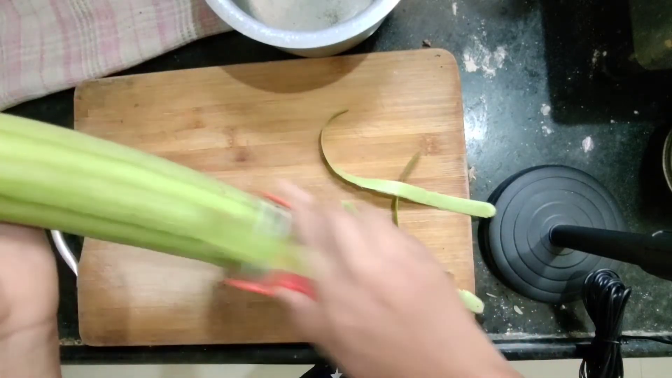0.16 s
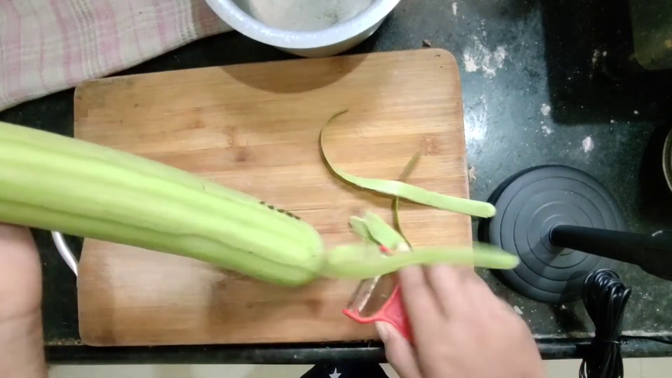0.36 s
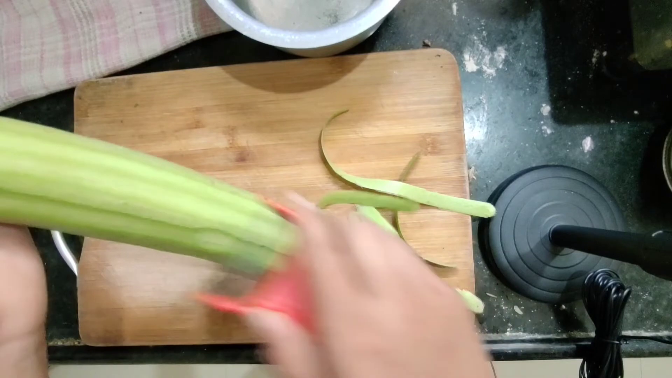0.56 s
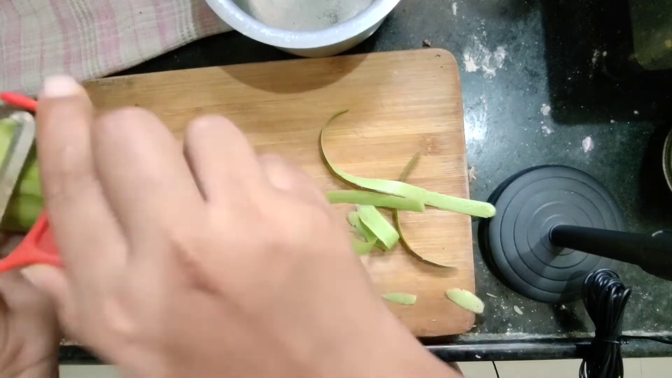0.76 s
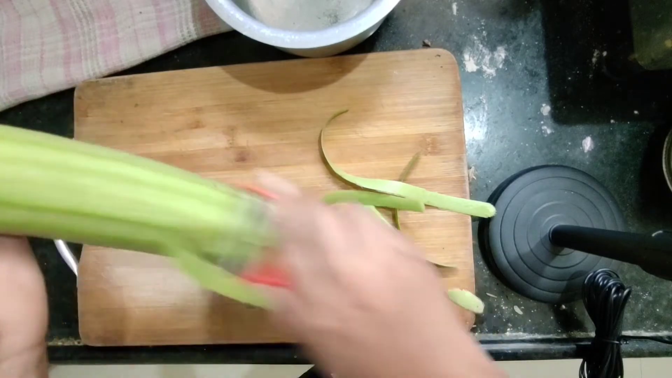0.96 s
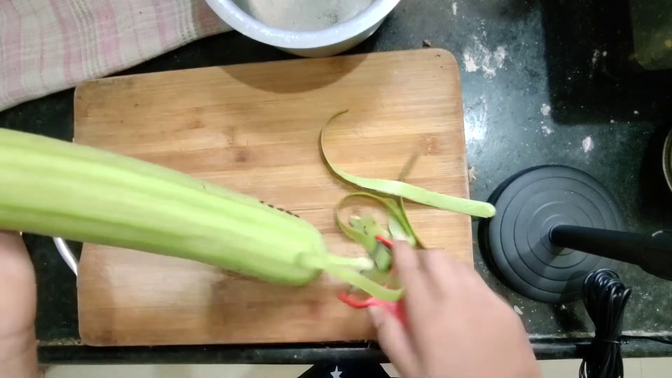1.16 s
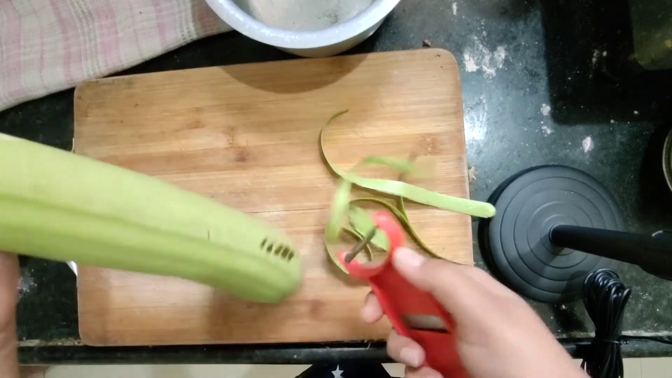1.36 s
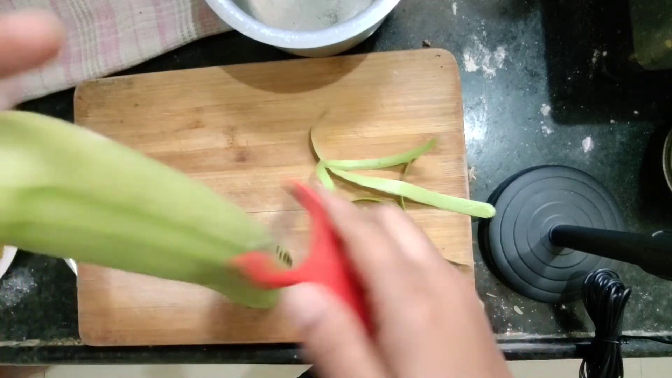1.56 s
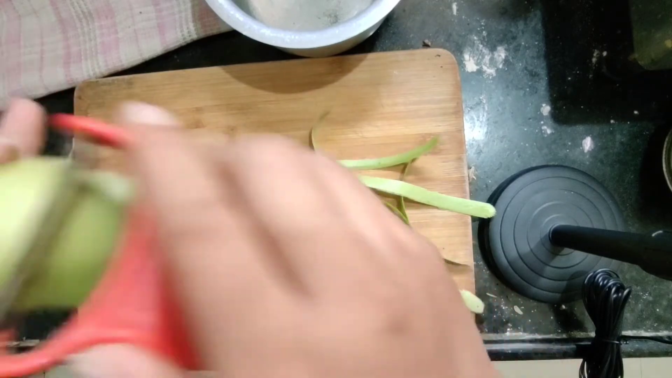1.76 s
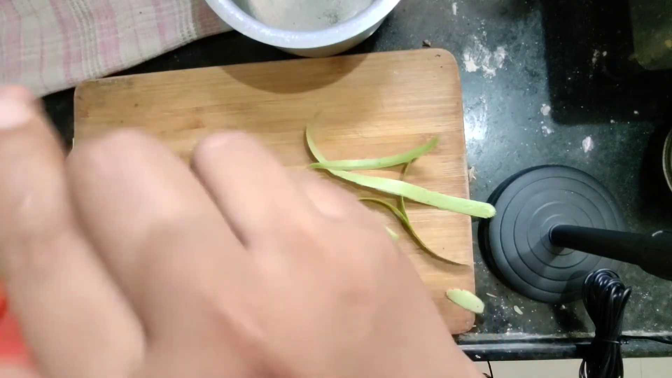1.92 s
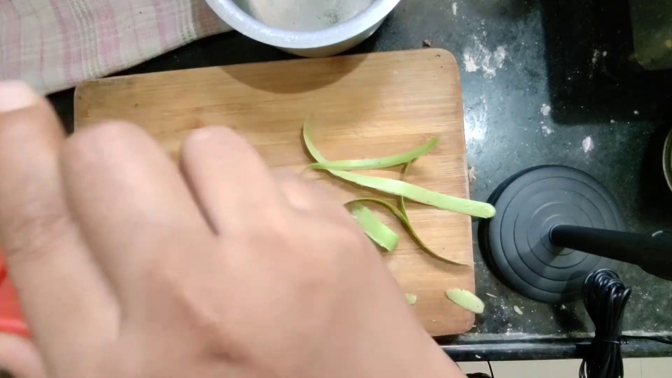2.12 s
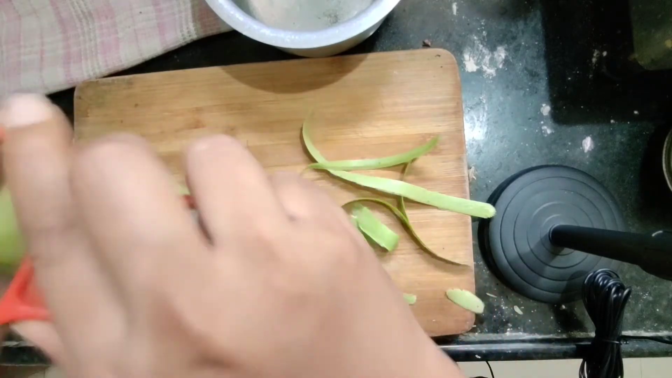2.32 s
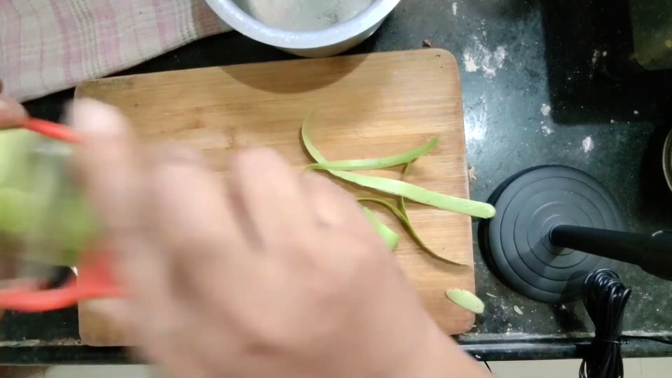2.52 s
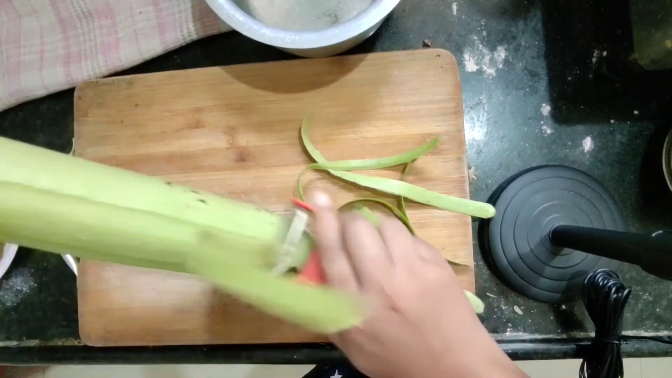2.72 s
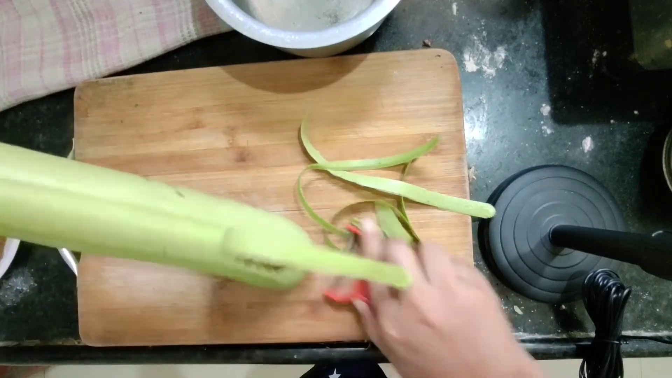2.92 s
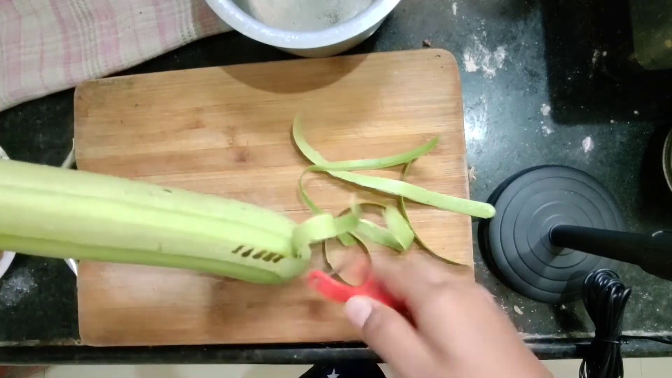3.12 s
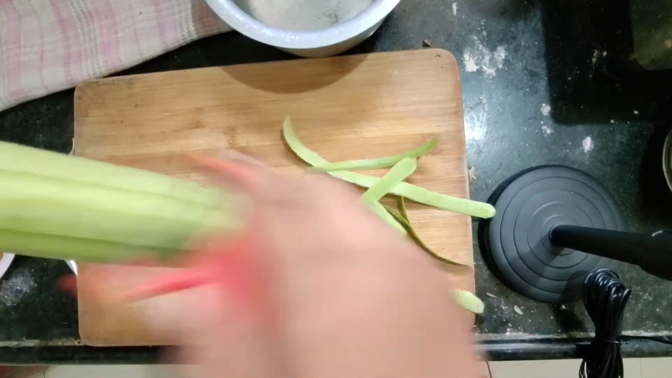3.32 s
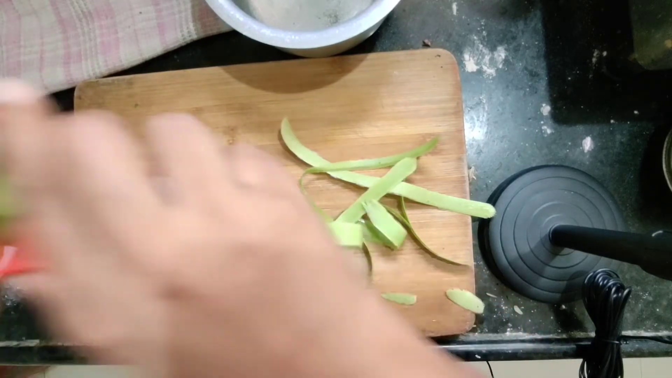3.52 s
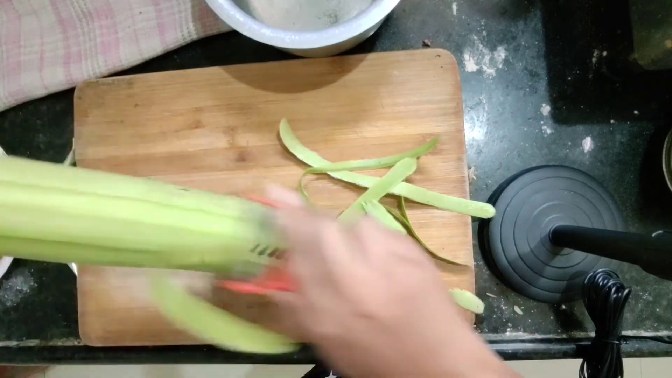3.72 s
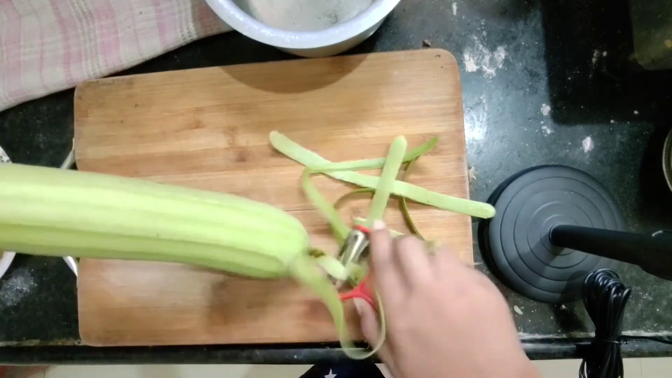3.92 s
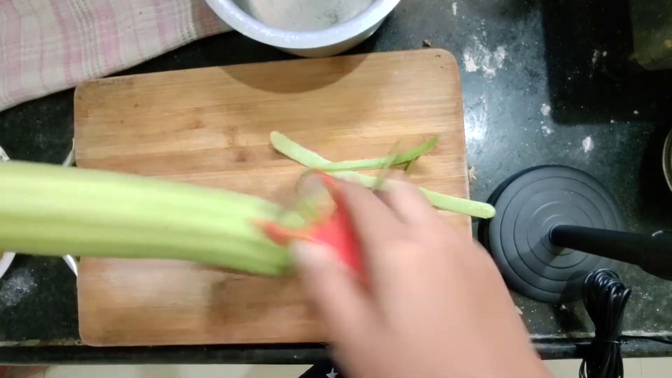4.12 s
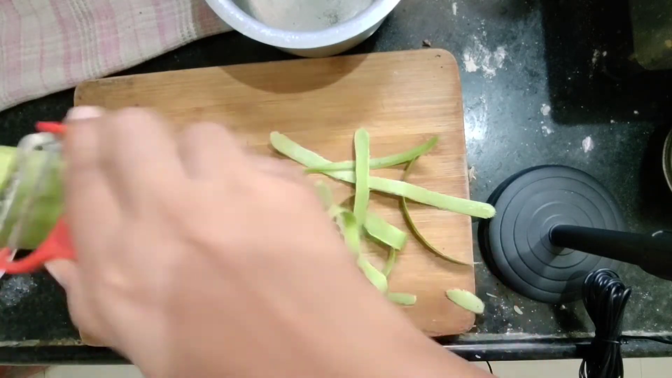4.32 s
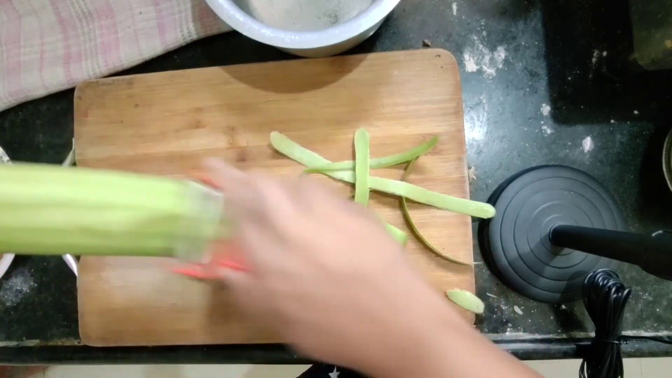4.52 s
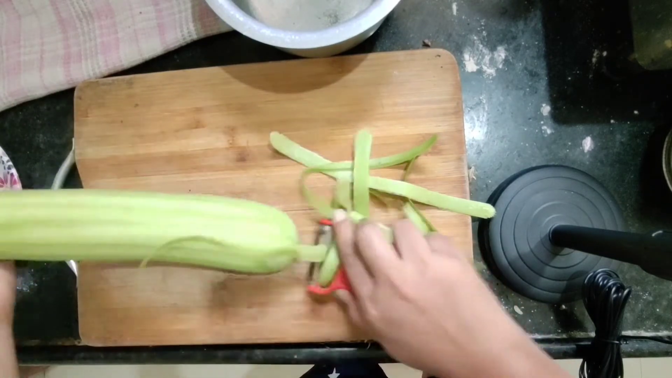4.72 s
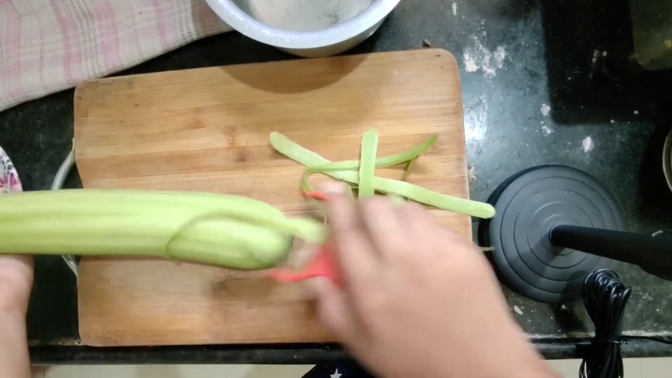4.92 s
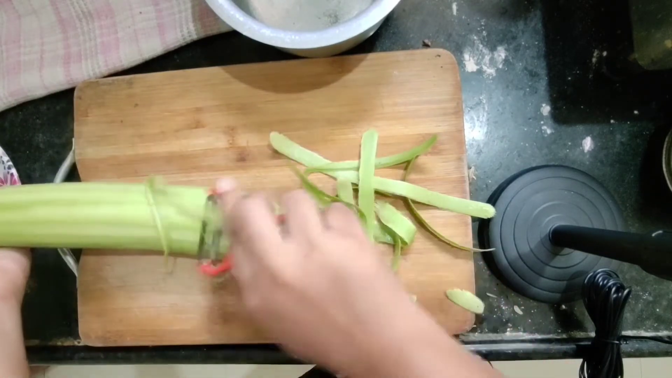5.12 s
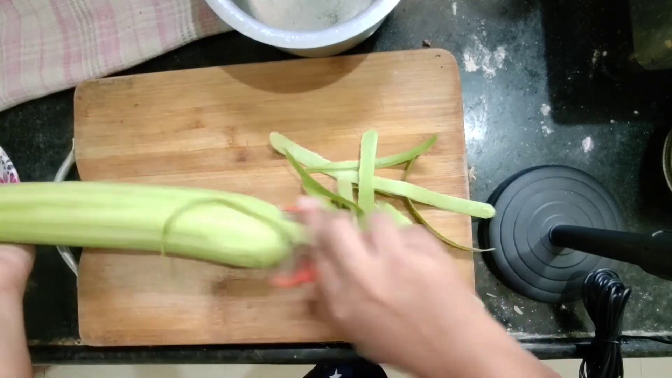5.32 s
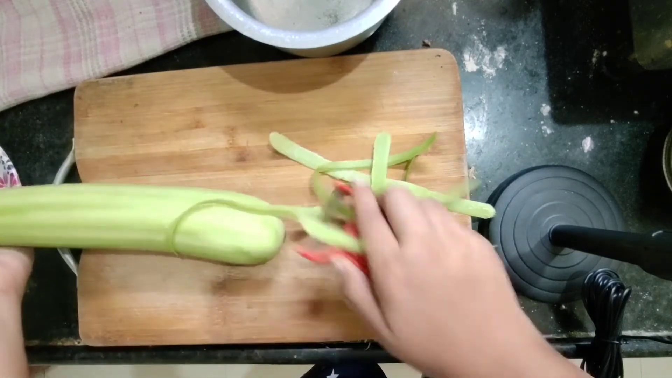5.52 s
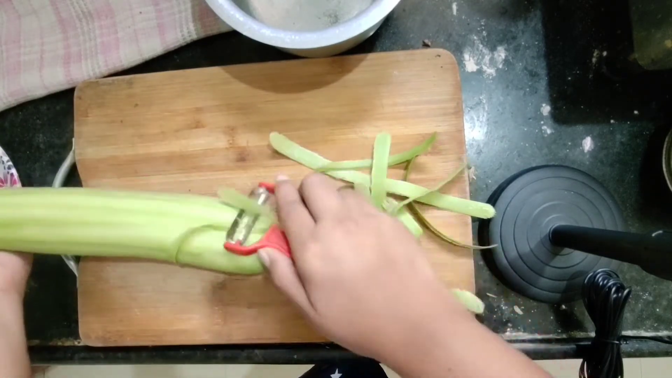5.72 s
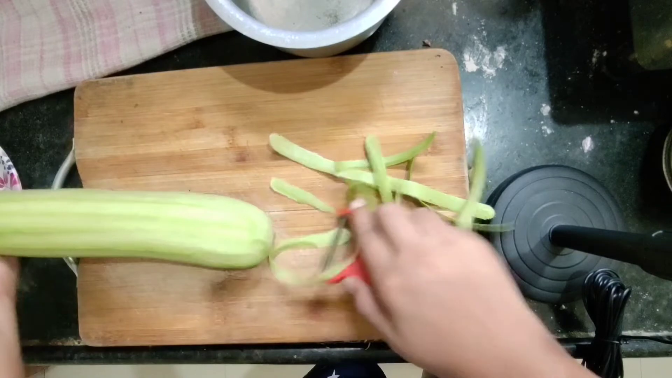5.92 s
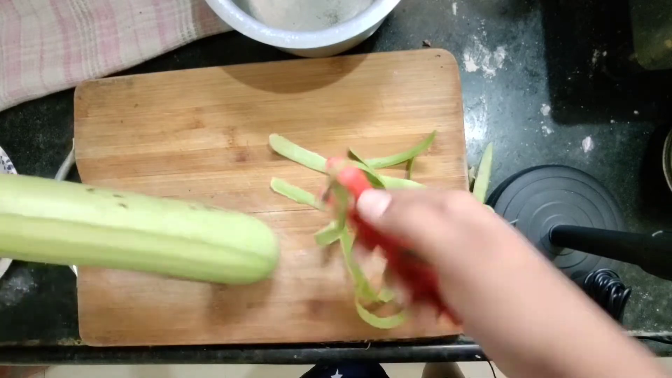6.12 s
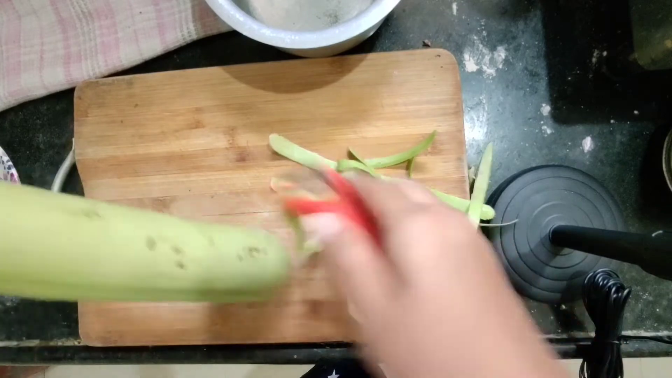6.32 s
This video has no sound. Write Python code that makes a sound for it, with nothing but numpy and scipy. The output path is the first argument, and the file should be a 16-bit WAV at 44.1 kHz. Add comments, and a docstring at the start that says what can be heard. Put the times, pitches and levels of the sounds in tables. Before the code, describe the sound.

Close up in a hard, lively kitchen, a loose-bladed peeler works along a raw gourd. A clack opens, then a crisp, wet, crunchy rasp runs to 0.4 s, ending in a rapid cluster of sharp snaps and a soft flop of peel near 0.5. A second stroke at 0.9-1.2 s ends with a snap. Light knocks and rubbing follow; around 2.0-2.1 the blade rattles repeatedly. A faint short scrape comes at 2.4 with dull bumps, then a longer, strong rasp from 2.6 to 3.1, snap and wet flops. More knocks lead to brisk strokes at 3.65-3.95, 4.5-4.8 and a slightly quieter one at 5.3-5.5, each preceded by clacks and finished by a bright snap and a flop. A last double snap clicks at 6.0. The short room ring fades into faint rumbling house noise, wavering low hum and light hiss.

```python
"""Peeling a gourd in a kitchen

A swivel peeler takes seven quick strips off a raw gourd above a wooden board in a hard-walled kitchen.
The rasp is made of tiny random bursts sent through filters and resonances; the blade snaps against its stop
as short noise buzzes; knocks, wet flops, dull bumps and rubbing fill the gaps.
Shaped random reflections make the room ring, over faint house noise, a hum and hiss."""
import sys
import numpy as np
from scipy import signal
from scipy.io import wavfile
from scipy.ndimage import uniform_filter1d, map_coordinates

SR = 44100
rng = np.random.default_rng(int(sys.argv[2]) if len(sys.argv) > 2 else 0)


def materialize(psi):
    """Save the field psi as 16-bit PCM at rate SR to the path in sys.argv[1].

    A 1-D psi becomes a single channel; in a 2-D psi each row is a channel.
    """
    bounded = np.clip(np.atleast_2d(psi).T, -1, 1)
    quanta = np.round(bounded * 32767).astype(np.int16)
    wavfile.write(sys.argv[1], SR, quanta)


N = 280598

# cells of the skin bursting against the steel: (frequency [Hz], relative level [dB per Hz])
TEAR_SPECTRUM = [(700, -43), (1550, -13.5), (2100, -14.5), (3450, -6.5), (3900, -0.5), (4450, -12.5),
                 (5750, -1.5), (6650, -2), (7200, -11), (8950, -4), (9900, -12), (12200, -11),
                 (14100, -18.5), (14800, -18)]
# resonances of the loose blade: (frequency [Hz], width [Hz], relative level [dB])
LOOSE_MODES = [(3244, 290, 4), (3472, 256, 2.5), (3930, 96, -6.5)]
# the crack of the stop, summed over all directions, as the room receives it; it also colours the peel
# and the rustle: (frequency [Hz], relative level [dB per Hz])
SPREAD_SPECTRUM = [(200, -41.5), (750, -15), (1350, -11.5), (1950, -7), (2450, -4.5), (2830, 5), (3150, 0),
                   (3400, 1.5), (3900, -4), (5600, 1.5), (7300, -1), (10000, -7), (13500, -15),
                   (15000, -16)]


def rasp():
    """Cells burst under the edge; the blade sticks and slips, and the flesh resounds."""
    # typically the blade lands, bites, eases and leaves; the bite may be set before the landing and the
    # easing after the leaving; a negative easing or catch reverses the change of level:
    # (lands [s], bites [s], has eased [s], leaves [s], landing time [s], tearing [dB], chatter [dB],
    # crunch [dB], easing drop [dB], catch rise [dB], brightness [dB per octave])
    strokes = [(.05, 0.167, .4, 0.42, 0.0032, -34, -32, -46.5, 6, -1, 0.5),
               (0.899, 0.97, 1.24, 1.222, .02, -36.5, -33.5, -48, 5.5, -2.5, -1),
               (2.355, 2.365, 2.43, 2.48, .006, -62, -47.5, -70, 6, -0.5, -4.5),
               (2.591, 2.68, 2.934, 3.103, 0.1, -33, -33, -46, 14.5, 8, 0),
               (3.646, 3.678, 3.95, 3.943, 0.018, -34.5, -32.5, -46, -2, 7, -0.6),
               (4.525, 4.555, 4.775, 4.832, .025, -36.5, -34.5, -47.5, 5.5, 7, 2),
               (5.272, 5.265, 5.44, 5.484, 0.0021, -42, -38.5, -52, 3, 10, -1.5)]
    # how each sound answers a stroke: (lag behind the bite [s], drop while skimming [dB],
    # turning point [share of the pull], drop before it [dB], drop after it [dB] (negative: louder),
    # share of the easing [ratio])
    answers = ((0.04, 4.5, .5, 3, 0.5, 1.0), (0.04, 7, 0.07, -1.3, 8, 0.88), (0.07, 16.5, 0.46, 2.5, -4.5, 0.7))
    # how much of the catch goes into each: (tearing [ratio], chatter [ratio], crunch [ratio])
    catch_shares = (1, 1.3, .25)
    # how much the uneven skin shakes each: (tearing [dB], chatter [dB], crunch [dB])
    uneven_levels = (0.67, 1.6, 0.4)
    # the blade held in the flesh, before the sag: (frequency [Hz], width [Hz], relative level [dB])
    held_modes = [(2861, 200, 0), (3154, 146, 4.5)]
    # the body of the gourd under the blade: (frequency [Hz], relative level [dB per Hz])
    flesh_spectrum = [(250, -31), (520, -21), (720, -2), (950, 1.5), (1200, -2), (1550, -16.5),
                      (2200, -34.5)]
    # the growing strip loads the blade and lowers its pitch: (share of the stroke [ratio], pitch factor [ratio])
    sag_curve = [(0, 1.06), (.55, 0.98), (1, .95)]
    catch_power = 0.87  # the catch builds as this power of time
    out = np.zeros(N)
    for (start, bite, eased, end, landing, tear_db, chatter_db, crunch_db,
         ease_db, catch_db, tilt_db) in strokes:
        t = np.arange(start, end, 1 / SR)
        along = np.linspace(0, 1, len(t))
        past_easing = np.clip((t - eased) / max(end - eased, 1e-3), 0, 1)
        catch = catch_db * past_easing ** catch_power

        gains = []
        levels = (tear_db, chatter_db, crunch_db)
        for db, answer, share, uneven_db in zip(levels, answers, catch_shares, uneven_levels):
            press_db = pressure(t, bite, eased, ease_db, *answer)
            gains.append(amp(db + press_db + share * catch + uneven_db * wobble(t)))
        tear, chatter, crunch = gains

        cells = grains(len(t), per_s=5500, spread_db=2.5)
        slips = grains(len(t), per_s=600, spread_db=-0.5)
        skin = off_board(colour(cells + 0.21 * slips, TEAR_SPECTRUM, tilt_db), along)

        sag = np.interp(along, *np.transpose(sag_curve)) * (1 + 0.028 * wobble(t))
        push = slips + 0.89 * cells
        blade = np.zeros(len(t))
        for k, (hz, width, db) in enumerate(held_modes):
            tone = resonate(resonate(push, hz * sag, width), hz * sag, 3 * width)
            blade += (-1) ** k * amp(db) * tone
        flesh = evened(colour(cells, flesh_spectrum))

        fade = np.clip(np.minimum((t - start) / landing, (end - t) / 0.0034), 0, 1)
        add(out, start, fade * (tear * skin + chatter * evened(blade) + crunch * flesh))
    return out


def pressure(t, bite, eased, ease_db, lag, skim_db, turn, early_db, late_db, share):
    """Level in dB over a stroke: low while skimming, up at the bite, then a curved rise or fall to the end."""
    bite_s = 0.0062  # how quickly the edge sinks in
    pull = np.clip((t - bite) / (eased - bite), 0, 1)
    turn = np.clip(turn, .05, .95)
    skimming = .5 - .5 * np.tanh((t - bite - lag) / (2 * bite_s))
    before = np.maximum(1 - pull / turn, 0)
    after = np.maximum((pull - turn) / (1 - turn), 0)
    return -skim_db * skimming - early_db * before ** 2 - (late_db + share * ease_db) * after ** 2


def off_board(x, along, far_s=.00078, near_s=.00052, shake_s=.000015):
    """The board's reflection arrives ever sooner as the unsteady blade comes down: a rising comb."""
    board_echo = .33  # strength of the reflection beside the direct sound
    steady_s = far_s + (near_s - far_s) * along
    delay = (steady_s + shake_s * wobble(np.arange(len(x)) / SR)) * SR  # in samples
    return evened(x + board_echo * map_coordinates(x, [np.arange(len(x)) - delay], order=3))


def snaps():
    """The freed blade buzzes against its stop for a few milliseconds: returns direct sound and room feed."""
    # the blade slips off the end and hits its stop:
    # (time [s], level [dB], ring [Hz], relative ring level [dB], brightness [dB per octave], room level [dB])
    stop_hits = [(0.4173, -11, 2880, -11, 0.5, -3), (0.4322, -8.5, 8330, -4, -0.5, -7),
                 (0.4535, -18, 5630, 0.5, -2, -10), (1.2312, -12.5, 3020, -14.5, -4.5, -5),
                 (3.0551, -8, 3235, -14, 2, -6), (3.974, -8.5, 3140, -4.5, 2.5, -2.5),
                 (4.8424, -9.5, 2870, -5.5, -1, -3), (5.4934, -9, 3240, -17, -3.5, -4.5),
                 (5.9869, -8, 7930, 0.5, -0.5, -7), (6.0073, -12, 2870, -2.5, -2.5, -1)]
    # the crack of the stop: (frequency [Hz], relative level [dB per Hz])
    crack_spectrum = [(150, -47), (450, -32.5), (800, -13.5), (1400, -19.5), (2350, -16), (2850, 9.5),
                      (3300, -0.5), (3700, 2.5), (4700, -7), (5800, 3.5), (7500, 1.5), (9700, -6.5),
                      (12000, -5.5), (15000, -19.5)]
    direct, spread, t = np.zeros(N), np.zeros(N), np.arange(4096) / SR
    for s, db, ring_hz, ring_db, tilt_db, room_db in stop_hits:
        onset = 1 - np.exp(-t / 0.0011)
        decay = np.exp(-(t / 0.0037) ** 4) + 0.21 * np.exp(-t / 0.013)
        buzz = rng.standard_normal(len(t)) * decay * onset
        tone = blow(ring(buzz, [(ring_hz, 300, 0)]))
        crack = blow(colour(buzz, crack_spectrum, tilt_db))
        add(direct, s, amp(db) * blow(crack + amp(ring_db) * tone))

        click = 1. * (t == 0)
        room_crack = blow(colour(click, SPREAD_SPECTRUM, 0.49 * tilt_db))
        add(spread, s, amp(db + room_db) * blow(room_crack + 0.32 * amp(ring_db) * tone))
    return direct, spread


def clacks():
    """A knock with grit just before and after rings the loose blade: returns main ring and high modes."""
    # the loose blade knocks in its frame: (time [s], level [dB], relative level of the high modes [dB])
    knocks = [(0.019, -28, 0.5), (0.039, -14, -1.5), (0.8853, -22.5, -3), (1.3222, -29, -2),
              (1.4226, -28.5, -19.5), (1.641, -41, -27), (1.98, -26.5, -15.5), (1.988, -29, -15),
              (2.0198, -23.5, -4), (2.0426, -24.5, -14), (2.0942, -28, -13), (2.1142, -23.5, -7.5),
              (2.376, -45.5, -2.5), (3.1642, -26.5, -1), (3.2925, -31, -6.5), (3.347, -25.5, -17.5),
              (3.5954, -41.5, -10), (3.6254, -29, -2), (3.6392, -23.5, -18), (3.6601, -28, -4.5),
              (4.4762, -44, -21), (4.503, -21, -6.5), (4.509, -15.5, -6), (5.2595, -19, -1),
              (5.827, -37, -31), (5.839, -38.5, -12), (5.855, -40, -11), (6.315, -45.5, -25)]
    # high modes, before their shaping below: (frequency [Hz], width [Hz], relative level [dB])
    high_modes = [(5750, 450, 7), (6825, 940, 0), (8090, 700, 5), (12000, 1200, -18.5)]
    # shaping of the two rings: (frequency [Hz], gain [dB])
    low_shape = [(400, -14.0), (1300, 4), (2000, -4), (2700, 1.5), (4000, 3), (6000, -12.0), (12000, -27.0)]
    high_shape = [(1000, -7.0), (5000, -3.0), (9000, -3.5), (10500, -5.0), (15000, 0.0)]
    main, bright, t = np.zeros(N), np.zeros(N), np.arange(-512, 2048) / SR
    for s, db, high_db in knocks:
        grazing = 0.072 * np.exp(-abs(t) / .0018)  # against the frame, before the knock
        settling = 0.078 * np.exp(-abs(t) / 0.0051)
        grit = np.where(t < 0, grazing, settling)
        knock = (t == 0) + grit * rng.standard_normal(len(t))
        low = colour(ring(knock, LOOSE_MODES), low_shape)
        high = colour(ring(knock, high_modes), high_shape)
        add(main, s + t[0], amp(db) * blow(low))
        add(bright, s + t[0], amp(db + high_db) * blow(high))
    return main, bright


def jiggles():
    """Many light touches ring the loose blade and scratch the skin."""
    # the blade jiggles as the peeler is carried back and set down: (start [s], length [s], ring level [dB])
    spells = [(1.928, .045, -65), (1.997, .04, -43.5), (2.1, .012, -36.5), (5.269, 0.02, -39)]
    out = np.zeros(N)
    for s, length, db in spells:
        touches = grains(round(length * SR), per_s=900, spread_db=6.5)
        scratch = evened(colour(touches, TEAR_SPECTRUM, tilt_db=-8.5))
        rattle = evened(ring(ring(touches, LOOSE_MODES), LOOSE_MODES))
        add(out, s, amp(db) * (rattle + amp(-4) * scratch))
    return out


def flops():
    """Wet peel tears free and flops down: each flop is a dense crackle that dies away quickly."""
    # (time [s], level [dB], time to fall to about a third [s])
    falls = [(0.513, -32, 0.062), (0.67, -71, .02), (3.139, -25.5, 0.02), (3.159, -28, 0.0215),
             (4.064, -32, 0.05), (4.11, -35, 0.017), (4.942, -29, 0.044), (4.99, -39.5, 0.052),
             (5.026, -31, 0.015), (5.5803, -28.5, 0.058), (5.694, -51, 0.013)]
    out, t = np.zeros(N), np.arange(8192) / SR
    for s, db, length in falls:
        crackle = grains(len(t), per_s=4900, spread_db=3.5) * np.exp(-(t / length) ** 2)
        add(out, s, amp(db) * blow(colour(crackle, SPREAD_SPECTRUM, tilt_db=-2.5), 0.33 * length))
    return out


def bumps():
    """A soft push gives a broad thud and a brief narrow ring."""
    # dull bumps of the gourd and the hand that holds it:
    # (time [s], level of each part [dB], ring [Hz], time for the push to fall to about a third [s])
    pushes = [(0.037, -64.5, 910, 0.0084), (0.31, -61, 330.8, .04), (0.621, -62.5, 191, 0.068),
              (0.894, -55, 718, 0.0077), (1.401, -64, 295, 0.035), (2.116, -49, 1317, 0.011),
              (2.487, -47.5, 479, 0.015), (2.489, -45.5, 870, 0.014), (3.657, -47.5, 628, 0.012),
              (4.504, -47, 795, 0.013), (5.253, -41.5, 740, 0.0053), (5.276, -35.5, 927, 0.0055)]
    # the push of a bump: (frequency [Hz], relative level [dB per Hz])
    body_spectrum = [(60, -15), (200, -3.5), (480, 2.5), (1250, 0), (1800, -20.5), (4000, -45)]
    out, t = np.zeros(N), np.arange(12000) / SR
    for s, db, hz, length in pushes:
        push = colour(rng.standard_normal(len(t)) * np.exp(-t / length), body_spectrum)
        thud = ring(push, [(hz, 0.12 * hz, 0)])
        tone = ring(push, [(hz, 25, 0)])
        add(out, s, amp(db) * (blow(thud, 0.16 * length) + blow(tone, .5 * length)))
    return out


def rubs():
    """Skin slips on the gourd in a soft swell, waking now one resonance and now another."""
    # the holding hand shifts on the gourd: (start [s], length [s], level of the tones at the peak [dB])
    shifts = [(1.359, 0.44, -69), (2.118, 0.52, -63.5), (2.549, 0.5, -59), (3.202, .39, -61),
              (4.179, 0.31, -70.5), (5.079, 0.21, -69), (5.76, .21, -73)]
    # what the palm rings in the gourd and board: (frequency [Hz], width [Hz], average relative level [dB])
    palm_modes = [(194, 40, -7), (328, 29, -5), (417, 71, -2), (697, 93, -1.5), (1036, 80, 0.5),
                  (1420, 140, -10)]
    rustle_db = -7  # the dry rustle of skin, relative to the tones
    out = np.zeros(N)
    for s, length, db in shifts:
        t = np.arange(0, length, 1 / SR)
        swell = amp(db) * np.sqrt(abs(np.sin(np.pi * t / length)))
        slips = grains(len(t), per_s=770, spread_db=1.5)
        tones = np.zeros(len(t))
        for hz, width, mode_db in palm_modes:
            tone = ring(ring(slips, [(hz, width, 0)]), [(hz, 3 * width, 0)])
            tones += amp(mode_db + 4.0 * wobble(.3 * t)) * evened(tone)
        rustle = evened(colour(slips, SPREAD_SPECTRUM, tilt_db=-3))
        add(out, s, swell * (evened(tones) + amp(rustle_db) * rustle))
    return out


def kitchen(x, count=3):
    """The arm keeps moving, so the sound drifts between several patterns of reflections."""
    turns = np.arange(N) / SR / 1.7  # one round of the patterns takes 1.7 s
    shares = [np.cos(np.pi * (turns + k / count)) ** 4 for k in range(count)]
    total = sum(shares)
    return sum(reflections(x * np.sqrt(share / total)) for share in shares)


def reflections(x, size=40000, uneven=0.16):
    """Dense reflections off tile and stone, mids ringing longest, bass and treble dying sooner."""
    # typical time to fall by 60 dB, before the random unevenness: (frequency [Hz], time [s])
    fall_times = [(200, 0.22), (1000, 0.49), (3000, 0.49), (6000, 0.41), (10000, 0.36), (15000, 0.31)]
    t = np.arange(size) / SR
    signs = rng.choice([-1., 1.], size)
    taps = signs * (rng.random(size) < .15) * np.clip((t - .002) / 0.0024, 0, 1)
    taps *= 1 + 0.67 * np.exp(-t / 0.0093)  # the counter and near walls answer first
    hz, at, z = signal.stft(taps, SR, nperseg=512)
    # some narrow bands ring on longer than others
    t60 = read(fall_times, hz) * np.exp(uneven * np.clip(rng.standard_normal(len(hz)), -2, 2))
    tail = signal.istft(z * amp(-60 * at / t60[:, None]), SR, nperseg=512)[1]
    return signal.fftconvolve(x, tail / np.linalg.norm(tail))[:N]


def background():
    """Faint noise of the house that drifts in patches, and a low, narrow noise band heard as a wavering hum."""
    # noise of the house: (frequency [Hz], relative level [dB per Hz]), then (time [s], level [dB])
    air_spectrum = [(25, -15), (65, -6), (150, 3), (260, -0.5), (400, -7.5), (700, -8.5), (1050, -4),
                    (1500, -18), (3000, -16), (8000, -27.5), (15000, -38)]
    air_levels = [(0.0, -68.5), (0.55, -64), (1.03, -65.5), (1.54, -69.5), (1.74, -78.5), (1.95, -71),
                  (2.28, -65.5), (3.37, -71.5), (4.38, -76.5), (4.82, -64.5), (4.96, -64), (5.53, -66.5),
                  (5.74, -74.5), (6.36, -65.5)]
    # the hum swells and fades: (time [s], level [dB])
    hum_levels = [(0.0, -74), (0.23, -86.5), (0.34, -61.5), (0.9, -71.5), (0.97, -53), (1.17, -80),
                  (1.5, -70.5), (1.75, -92.5), (2.53, -58.5), (2.6, -75), (2.69, -59), (2.82, -79.5),
                  (3.61, -79.5), (3.65, -64), (3.97, -84), (4.29, -58.5), (4.57, -88), (4.96, -75.5),
                  (5.37, -78), (5.44, -62), (5.83, -89), (5.9, -67), (6.27, -76.5), (6.36, -93)]
    # strength of the patches: (frequency [Hz], typical swing [dB])
    patch_swing = [(100, 6.4), (400, 8), (1200, 4.6), (2500, 1.2)]
    frames, hz = N // 512 + 5, np.fft.rfftfreq(2048, 1 / SR)
    a, b, patches = rng.standard_normal((3, frames, len(hz)))
    patches = uniform_filter1d(patches, size=14, axis=0)  # smooth in time
    patches = evened(uniform_filter1d(patches, size=5, axis=1))  # smooth in pitch
    z = (a + 1j * b) * amp(read(air_spectrum, hz) + read(patch_swing, hz) * patches)
    air = evened(signal.istft(z.T, nperseg=2048, noverlap=1536)[1][:N])

    hum_mode = [(115.5, 19, 0)]  # frequency and width in Hz, level in dB
    hum = evened(ring(ring(rng.standard_normal(N), hum_mode), hum_mode))
    return follow(air_levels) * air + follow(hum_levels) * hum


def amp(db):
    """Turns dB into a plain gain."""
    return 10 ** (np.asarray(db) / 20)


def evened(x):
    """Scales a sound to an average (RMS) level of 1."""
    return x / np.sqrt(np.mean(x ** 2) + 1e-20)


def read(points, hz):
    """Reads a table of (frequency, value) at any frequency, along a logarithmic scale."""
    f, value = np.transpose(points)
    return np.interp(np.log(hz + 1), np.log(f + 1), value)


def follow(rows):
    """Turns a table of (time [s], level [dB]) into a gain for every sample."""
    return amp(np.interp(np.arange(N) / SR, *np.transpose(rows)))


def add(mix, s, sound):
    """Adds a sound to the mix at the given second."""
    part = mix[max(round(s * SR), 0):][:len(sound)]
    part += sound[:len(part)]


def colour(x, points, tilt_db=0, size=2048):
    """Filter with the given spectrum, tilted by dB per octave in the treble; nothing sounds ahead of time."""
    hz = abs(np.fft.fftfreq(size, 1 / SR))
    log_gain = np.log(amp(read(points, hz) + tilt_db * np.log2(1 + hz / 1000)))
    taps = np.fft.ifft(np.exp(np.conj(signal.hilbert(log_gain)))).real
    return signal.fftconvolve(x, taps[:size // 2])[:len(x)]


def ring(x, modes):
    """Damped resonances of alternating sign, driven by x."""
    out = 0
    for k, (hz, width, db) in enumerate(modes):
        out = out + (-1) ** k * amp(db) * signal.lfilter(*signal.iirpeak(hz, hz / width, SR), x)
    return out


def resonate(x, hz, width):
    """A resonance whose centre follows the curve hz."""
    turn = np.exp(2j * np.pi * np.cumsum(hz) / SR)
    r = np.exp(-np.pi * width / SR)
    return 2 * (turn * signal.lfilter([1 - r], [1, -r], x / turn)).real


def blow(x, seconds=0.0028):
    """Scales a hit to the energy of a unit signal that lasts the given time."""
    return x * np.sqrt(seconds * SR / np.sum(x ** 2))


def grains(n, per_s, spread_db):
    """Tiny fractures at random moments, with random signs and random sizes, at an average level of 1."""
    chance, sign = rng.random(n), rng.choice([-1., 1.], n)
    size = np.minimum(rng.exponential(1, n), 4)
    return evened((chance < per_s / SR) * sign * amp(spread_db * size))


def wobble(t, count=12):
    """Slow chance, from the unevenness under blade or hand: sines with random phases, RMS 1."""
    return evened(sum(np.sin(2 * np.pi * (hz * t + rng.random())) for hz in np.geomspace(4, 45, count)))


def suppress(x, threshold_db=-104, depth_db=-12, steepness=.75):
    """Noise suppression: every band that sinks towards the threshold (dB per Hz) is turned down."""
    z = signal.stft(x, SR, nperseg=1024, noverlap=768, scaling="psd")[2]
    power = uniform_filter1d(abs(z) ** 2, size=5, axis=-1)  # smooth in time
    power = 2 * abs(uniform_filter1d(power, size=3, axis=-2))  # smooth in pitch
    gain = np.maximum((power / (power + amp(threshold_db) ** 2)) ** steepness, amp(depth_db))
    return signal.istft(z * gain, SR, nperseg=1024, noverlap=768, scaling="psd")[1][:, :N]


def scene():
    """Adds up all sources, the room that answers them, the background and a steady hiss."""
    cut, flop, bump = rasp(), flops(), bumps() + rubs()
    clack, clink = clacks()
    clack = clack + jiggles()
    snap, snap_spread = snaps()
    to_room = snap_spread + amp(-6.5) * cut + amp(-11) * clack + amp(-5.0) * clink
    to_room = to_room + amp(-3.5) * flop + amp(-1) * bump
    room = kitchen(to_room)
    hiss = amp(-68) * rng.standard_normal(N)
    return (cut + clack + clink + flop + bump + snap + room + background() + hiss)[None]


def record(dry, low_cut_hz=58):
    """The hardest snaps overload the microphone, quiet tails are suppressed; then a low cut and the band limit."""
    edge_hz = 15520  # band limit
    held = suppress(1.3 * np.tanh(dry / 1.3))
    held = signal.sosfilt(signal.butter(2, low_cut_hz, "high", fs=SR, output="sos"), held)
    taps = signal.firwin(401, edge_hz, window=("kaiser", 8), fs=SR)
    return signal.oaconvolve(held, taps[None], "same")


dry = scene()
out = record(dry)
materialize(out)
```